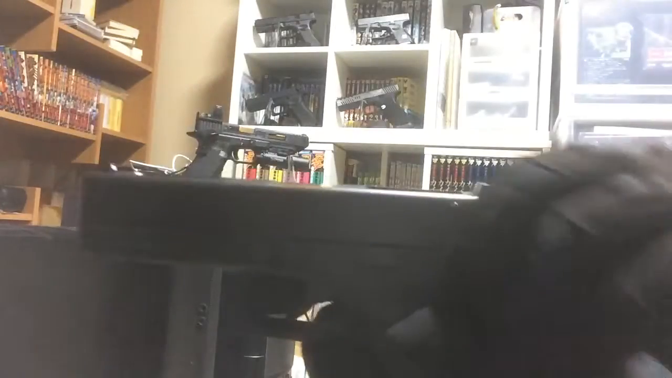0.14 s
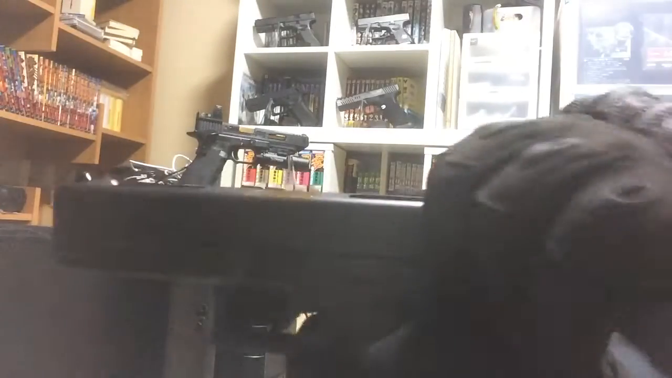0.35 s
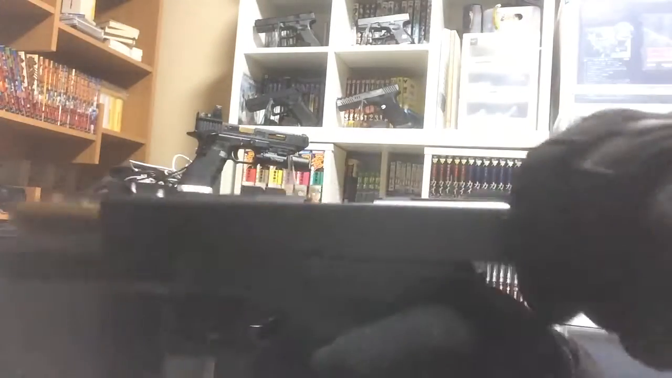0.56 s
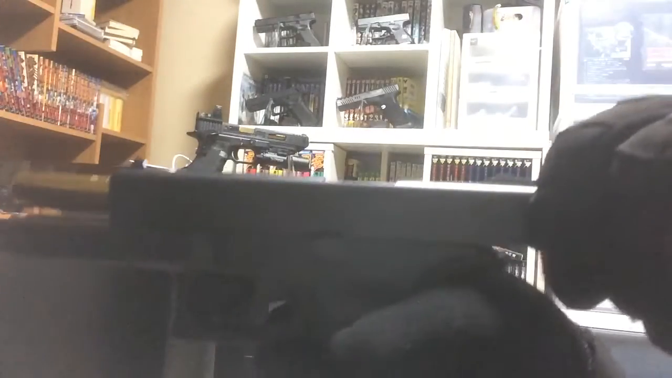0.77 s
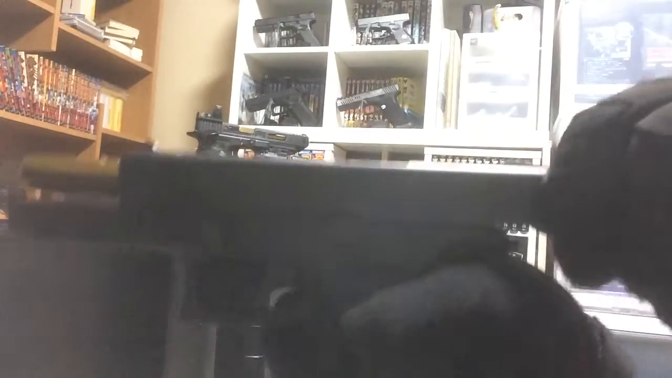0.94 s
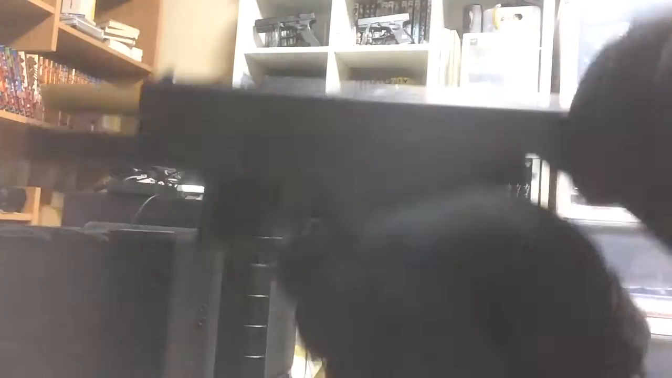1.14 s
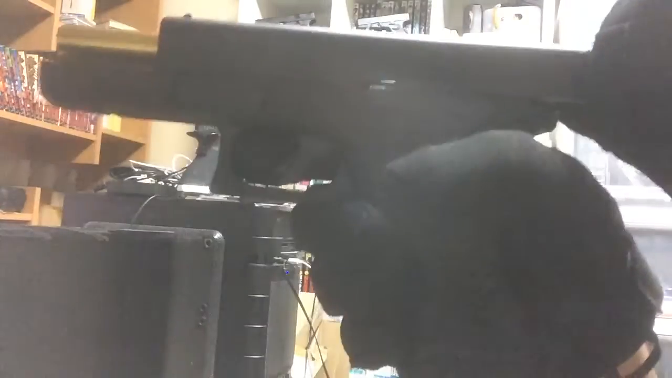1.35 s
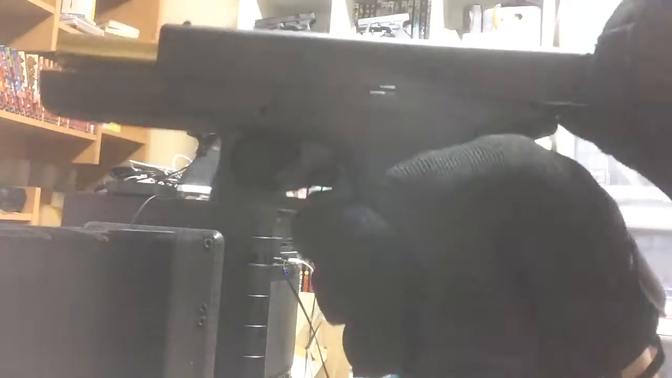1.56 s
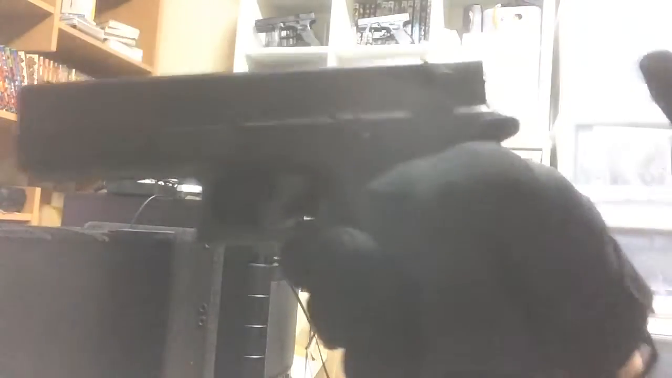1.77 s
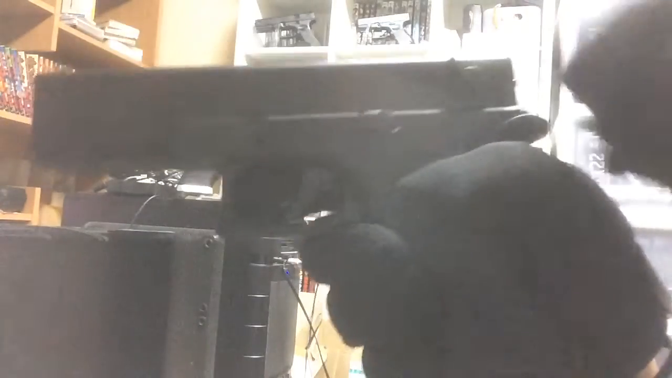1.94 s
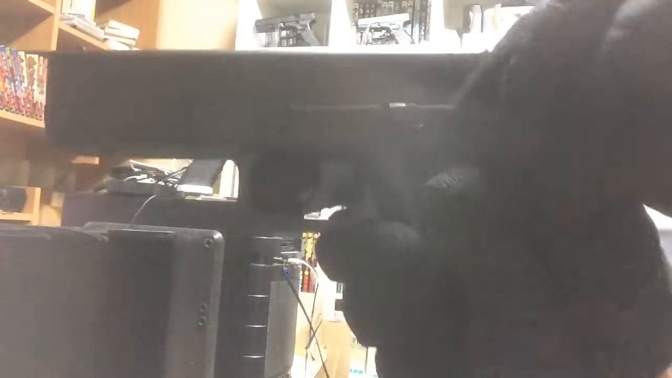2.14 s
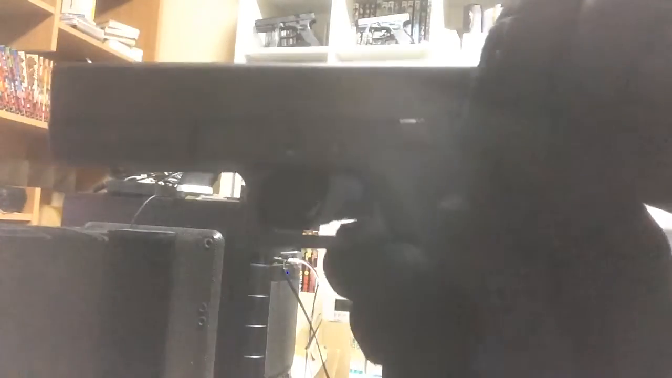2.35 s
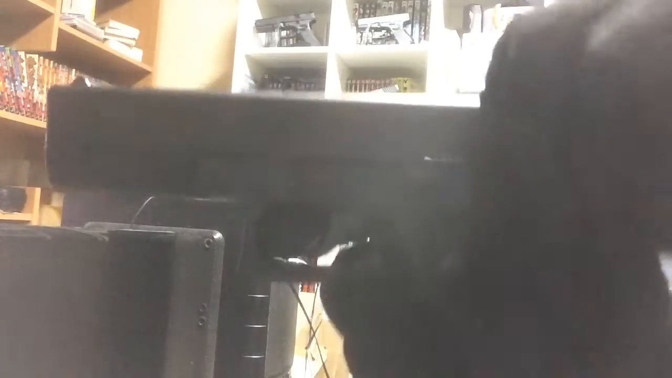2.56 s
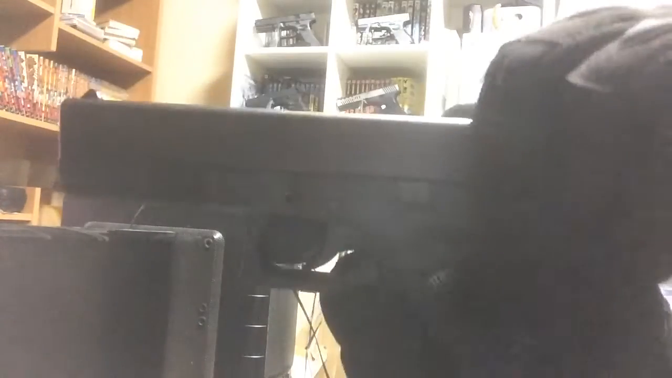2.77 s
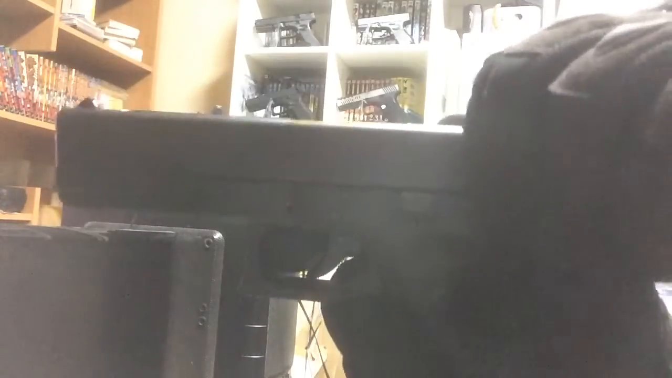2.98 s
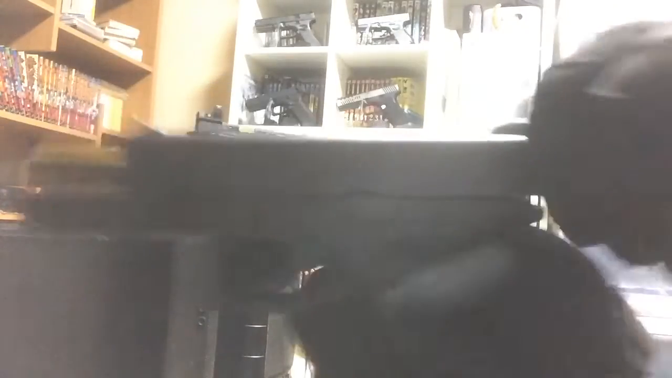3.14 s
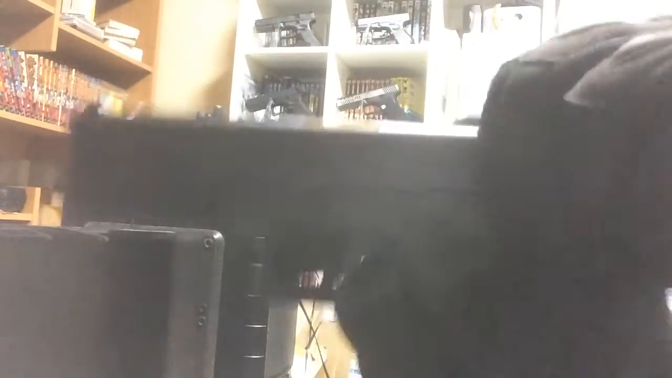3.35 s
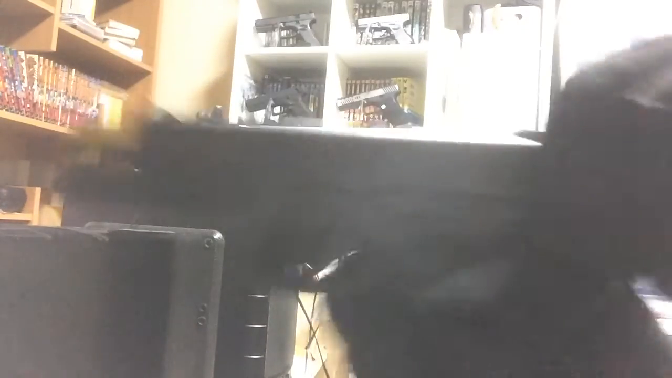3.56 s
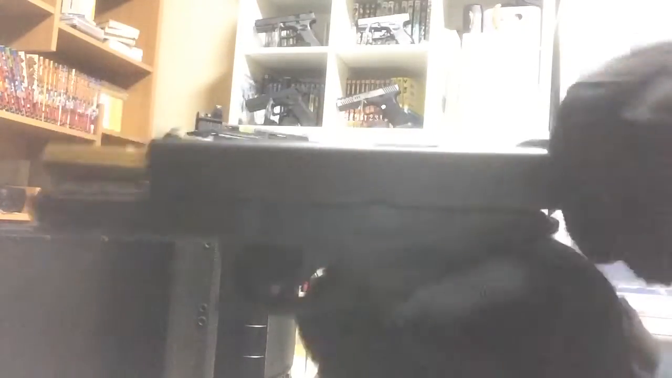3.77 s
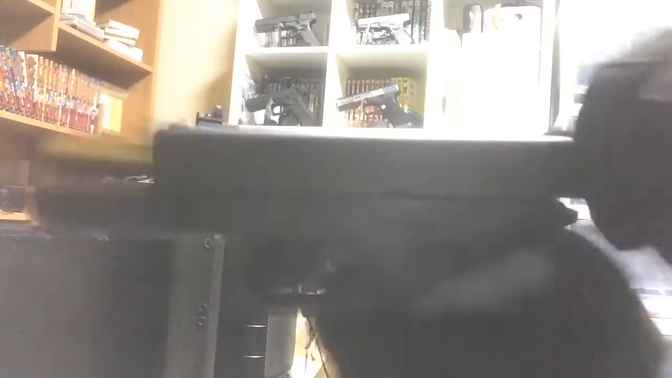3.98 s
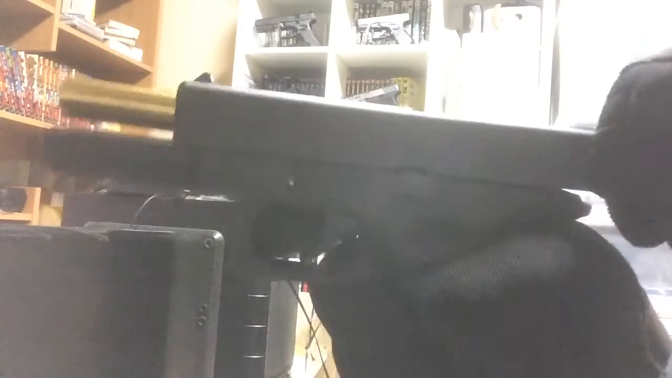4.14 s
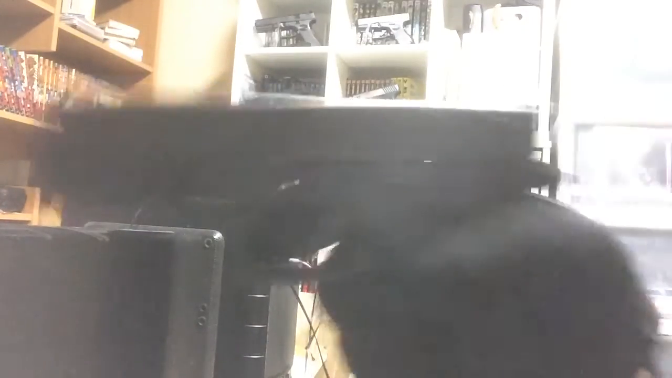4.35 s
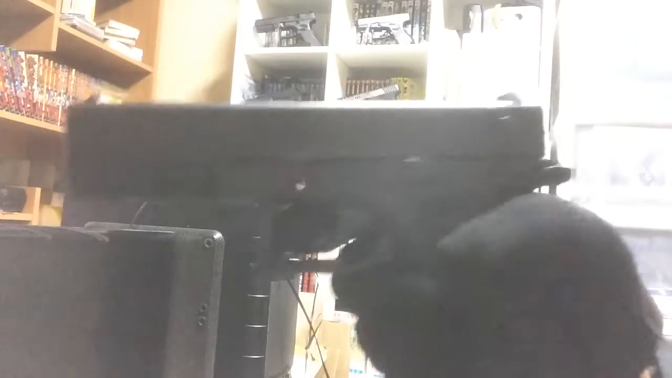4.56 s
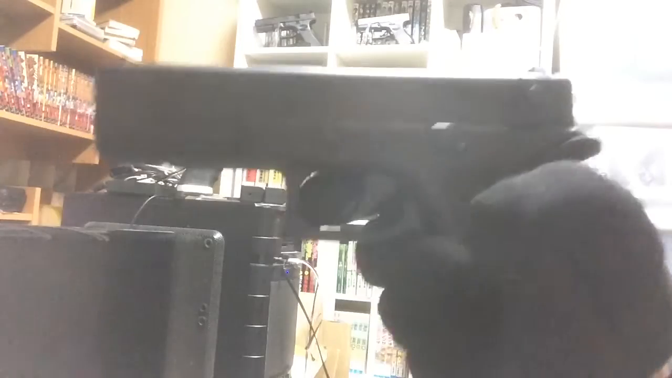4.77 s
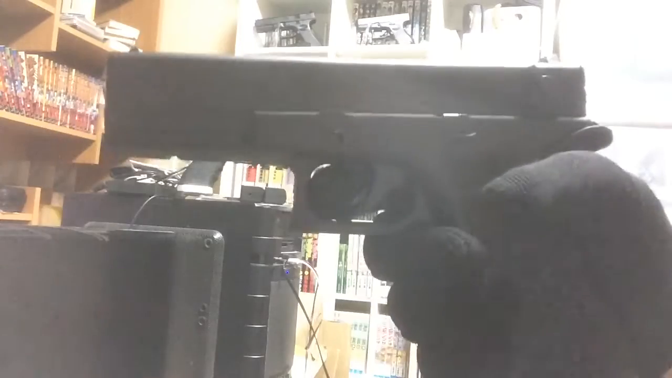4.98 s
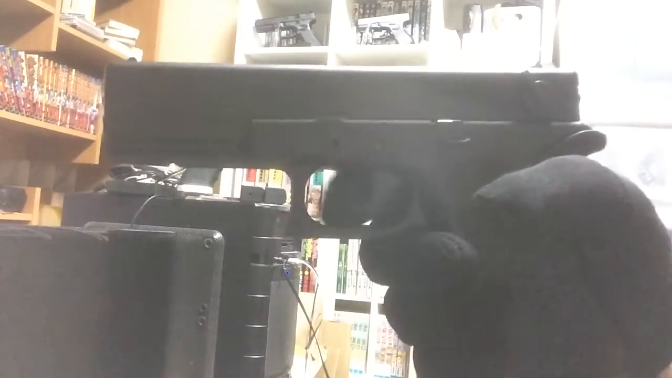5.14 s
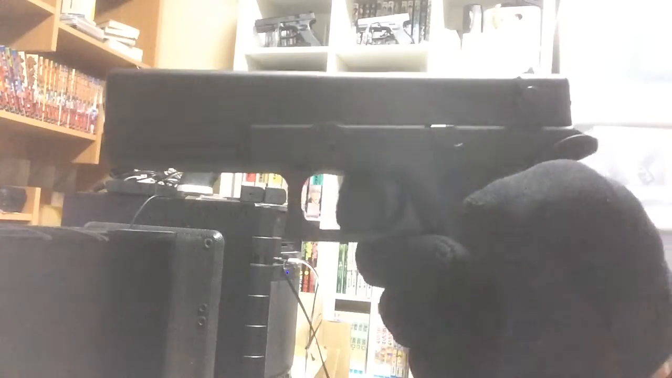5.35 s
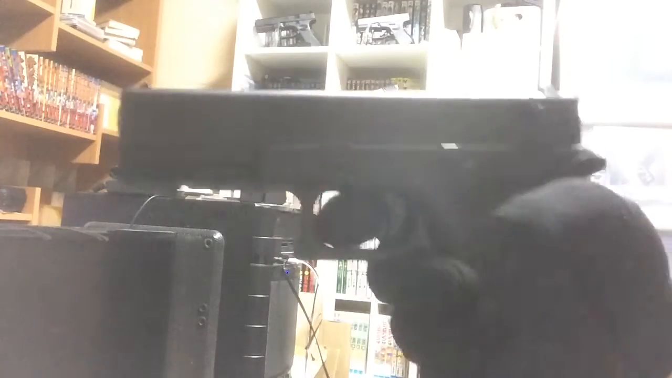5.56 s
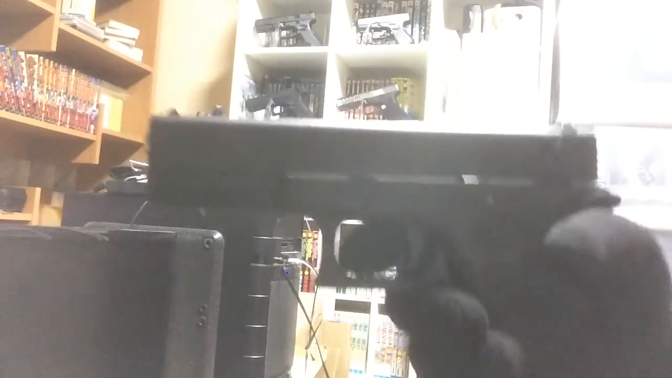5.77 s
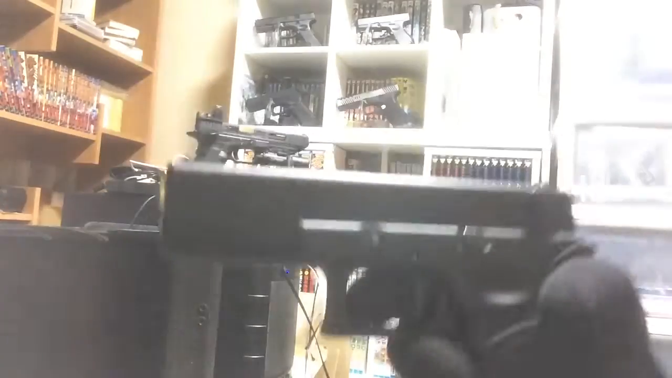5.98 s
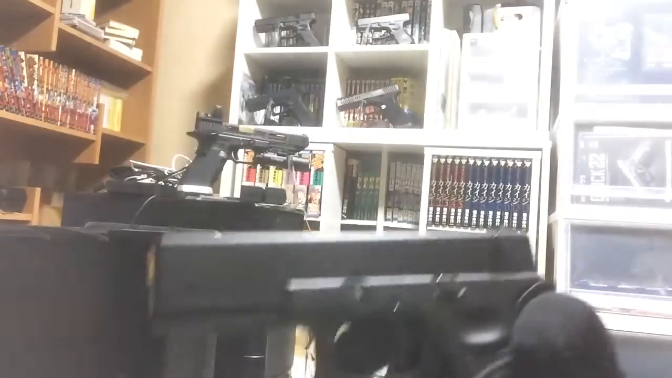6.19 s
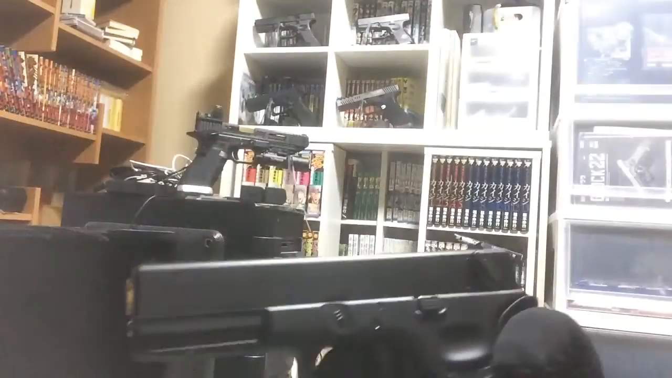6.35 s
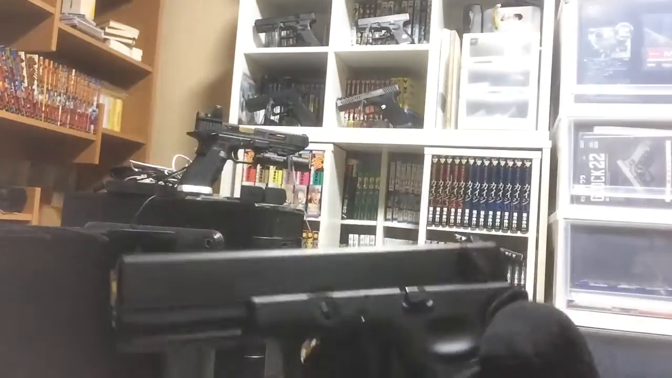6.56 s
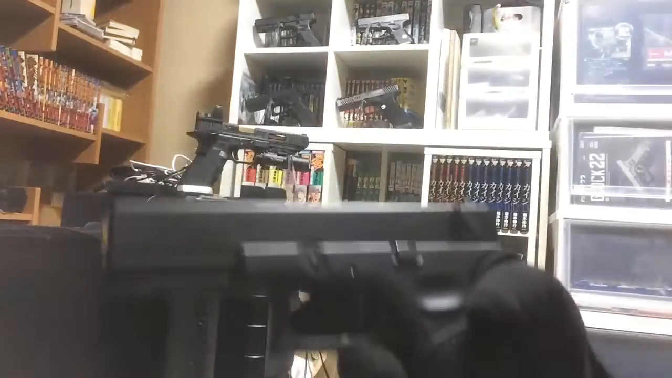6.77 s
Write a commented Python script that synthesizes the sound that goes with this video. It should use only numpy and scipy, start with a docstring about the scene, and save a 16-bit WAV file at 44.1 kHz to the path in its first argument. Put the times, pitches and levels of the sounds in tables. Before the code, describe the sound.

A toy pistol's slide is pulled and released with sharp metallic clacks, racked four times quickly, then dry-fired once in a small room.

```python
"""A small room, one microphone close to a gas toy pistol. A fan hums faintly; a glove shifts on the grip.
At 0.6 s the slide is pulled: the barrel unlocks and rings, the hammer cocks, the rear stop knocks.
Let go at 1.8 s, it bumps over the hammer and slams home. Four quick racks follow from 3.1 to 4.5 s,
and at 5.3 s the hammer falls in a dry shot. The blows hit the limiter, and the gain control
ducks the fan behind them."""
import sys
import numpy as np
from scipy import signal
from scipy.fft import rfft, irfft
from scipy.io import wavfile
from scipy.ndimage import uniform_filter1d, minimum_filter1d

SR = 44100
rng = np.random.default_rng(int(sys.argv[2]) if len(sys.argv) > 2 else 0)


def generate_wav(sig):
    """Save sig (samples, or channels by samples) to the path in sys.argv[1] as 16-bit PCM at SR."""
    pcm = np.round(np.clip(np.atleast_2d(sig).T, -1, 1) * 32767).astype(np.int16)
    wavfile.write(sys.argv[1], SR, pcm)


N = 300762
HIT = np.arange(4096) / SR  # time within one blow

# the fan's rush of air: f/Hz, level/dB
FAN_SPECTRUM = [(15, -40.5), (25, -17.5), (80, -10.5), (130, -15.5), (309, -8.5), (344, -4.5), (373, -9.5),
                (516, -11), (677, -13.5), (734, -14), (2110, -21.5), (2690, -28.5), (4250, -29),
                (11900, -38.5), (16000, -45)]
# the fan's hum: f/Hz, level/dB, waver/Hz
FAN_TONES = [(341, -67.5, 1.6), (682, -75, 7.1), (238, -75.5, 5.9), (97.5, -79, 2.4)]
# the glove shifts on the grip: t/s, length/s, level/dB
RUSTLES = [(.14, 0.22, -61.5), (2.13, .12, -63), (2.2, 0.38, -66.5), (2.84, 0.071, -66.5),
           (4.88, 0.088, -64), (5.72, .14, -72), (5.97, 0.16, -67.5)]
# glove friction: f/Hz, level/dB
GLOVE_SPECTRUM = [(200, -14), (1200, 11.5), (3500, 6), (7000, 3), (11000, -7.5), (16000, -22)]
# resonances of slide and frame: f/Hz, width/Hz, height/dB
FRAME_MODES = [(1288, 170, 4.5), (2020, 190, 7), (2226, 240, 2.5), (3330, 76, 2.5), (4490, 53, 8),
               (6050, 230, 2), (7400, 920, 6.5), (10580, 630, 4), (11880, 540, 4.5), (13800, 140, 5),
               (14550, 890, 5)]
# steel tapping steel: f/Hz, level/dB
STEEL_SPECTRUM = [(60, -45.5), (300, -27), (700, -15.5), (950, -7.5), (1200, .5), (1700, -1), (3000, -3),
                  (4300, -3.5), (6500, -8), (9000, -11.5), (12000, -11.5), (16000, -11)]
# trigger and grip tick: t/s, level/dB, mids over lows/dB, treble over lows/dB
TICKS = [(.5108, -42, -13.5, -28), (.731, -30, 4, 4), (0.762, -38, -2, -5), (1.2866, -59, -3, -15),
         (1.7207, -49, -9, -15.5), (3.132, -43, -3.5, -23.5), (4.229, -38.6, 2, -4.5),
         (4.8351, -52.5, -4.5, -21.1), (5.1855, -60, 6.5, 3), (5.2616, -48, -17, -24),
         (5.279, -34, -6, -21), (5.5092, -38.5, 1.5, -8.5), (6.1577, -63, 1, -10)]
# the recoil spring's thin tones: f/Hz, level/dB, t60/s
SPRING_MODES = [(10600, 0.5, 0.044), (11196, 1, .11), (11901, 2.5, .06), (13100, 5, .08),
                (14527, -1.5, .07)]
# the spring zings at the rear stop: t/s, level/dB, f/Hz, t60/s
ZINGS = [(0.659, -17, 14330, .11)]
# what the walls send back: f/Hz, level/dB
WALL_SPECTRUM = [(100, -9), (500, -6.5), (800, -8.5), (1300, -3.5), (2500, -1.5), (5000, 0.5), (8000, 1),
                 (12000, -1), (16000, 0)]
# the room's decay: f/Hz, t60/s
ROOM_T60 = [(200, 0.1), (800, 0.14), (2000, .17), (5500, .16), (10000, .15), (15000, .13)]
# echoes off desk and shelves: delay/s, level/dB
ECHOES = [(.0072, -9.5), (.0112, -11), (0.0161, -13.5)]
# the slide travels on its rails: t/s, length/s, rubbing/dB, rattle/dB
STROKES = [(.534, .024, -47.5, -45.5), (0.562, 0.1, -27, -25.5), (1.735, 0.033, -38.5, -40.5),
           (3.169, .1, -23, -21.5), (3.31, 0.095, -40.5, -30.5), (3.521, 0.11, -25, -29),
           (3.64, .06, -41, -34), (3.79, .085, -29.5, -25), (3.894, 0.065, -48.5, -39),
           (4.019, 0.073, -25, -25), (4.396, .02, -43.5, -50.5), (4.413, .035, -29, -32.5)]
# the loose slide clacks: t/s, level/dB, mids over lows/dB, treble over lows/dB
CLACKS = [(0.5493, -32.5, 3.5, -18), (0.6343, -14.5, -6.5, -7), (1.7448, -33, 11, 1), (1.7643, -9, 4, 3),
          (3.155, -36, -13.5, -26), (3.1615, -22.5, -1.5, 1.5), (3.24, -9.5, -2.5, -1),
          (3.3843, -21, -6, -6), (3.392, -19.5, -5.5, -29.5), (3.507, -19, 1, -1.5), (3.545, -18.5, 0, 6.5),
          (3.6771, -23, -3, -12), (3.723, -13, 10.5, 12), (3.782, -21.5, -6.5, -10), (3.852, -24, -8, -17),
          (3.957, -27.5, 4.5, -2.5), (4.4183, -14, 2.5, -5.5), (4.4368, -13.5, 1.5, 0)]
# the barrel tube's ring: f/Hz, level/dB, t60/s
BARREL_MODES = [(7264, -2, 0.06), (7050, -9.5, 0.036), (7530, -7.5, 0.036), (7700, -18, 0.043),
                (10440, -20.5, 0.073), (11770, -13.5, 0.037), (13100, -15.5, 0.033), (15500, -22.5, .035)]
# the barrel unlocks: t/s, level/dB, ring/dB, lead of the lug's touch/s, that touch/dB, seating/dB
UNLOCKS = [(0.5712, -9.5, -2, 0.011, -15.5, -6), (3.1788, -12, 3, 0.008, -13.5, -11),
           (3.5257, -11.5, -16, 0.0063, -18.5, -14.5), (3.804, -12.5, -6.5, 0.0075, -21, -16.5),
           (4.0438, -14, -4.5, .0047, -17, -13.5)]
# the hammer snaps onto its sear: t/s, level/dB
COCKS = [(0.6044, -7.5), (3.218, -7.5), (3.552, -8), (3.8257, -9), (4.06, -10)]
# the hammer being cocked: f/Hz, level/dB
COCK_SPECTRUM = [(60, -43.5), (400, -22), (900, -13.5), (1300, 2), (1800, -1), (3000, 2.5), (4200, -2.5),
                 (5200, -13.5), (7000, -15), (10000, -19.5), (13000, -23), (16000, -19)]
# the slide hits its rear stop: t/s, level/dB, mids over lows/dB, treble over lows/dB, bounce delay/s
REAR_STOPS = [(.6595, -1, -9, -9, 0.011), (3.269, -4, -1.5, -9.5, 0.0076), (3.59, -19.5, -10, -10, .013),
              (3.877, -9.5, 1.5, -9.5, 0.0064), (4.092, -1, -8, -9, 0.013)]
# low jolts of the heaviest blows: t/s, level/dB, lower edge/Hz, upper edge/Hz
THUDS = [(0.6596, -9, 20, 620), (1.7772, -4.5, 350, 785), (3.4154, -12, 14, 446), (3.708, -6, 240, 838),
         (3.9795, -8.5, 120, 300), (4.0921, -29.5, 30, 377), (4.4509, 1, 220, 1053), (5.3062, -8, 20, 444)]
# the slide runs forward over the hammer: t/s, level/dB
BUMPS = [(1.755, -10), (3.364, -21.5), (3.6608, -18), (3.94, -15.5), (4.429, -7.5)]
# the slide slams home: t/s, level/dB, mids over lows/dB, treble over lows/dB, ring/dB, chatter/s,
# room send/dB, barrel pickup/dB
SLAMS = [(1.7741, -6, 2, 1, -19, 0.0055, -1.5, -17), (3.4158, -2.5, -2.8, -2.3, -11, 0.0055, -11, -14),
         (3.7054, -7, -4.5, -3.5, -13.5, 0.0087, -10, -23),
         (3.9764, -2.5, -3.5, -4.5, -14, 0.0067, -12, -22.5),
         (4.4458, -3.5, 1, 0.5, -16, 0.0068, -4, -18.5)]
# slide and frame pressed shut: f/Hz, level/dB
LOCKED_SPECTRUM = [(60, -25.5), (300, -8.5), (700, -5.5), (1000, -4), (1400, -0.5), (2200, -1), (3200, 2),
                   (4500, -0.5), (6500, -2.5), (9000, -11), (12000, -4), (16000, -12)]
# the sear lets go, then the hammer falls: t/s, level/dB, room send/dB
DRY_FIRE = [(5.3041, -22, -20.5), (5.306, -2.5, -10.5)]
# the snap of the dry shot: f/Hz, level/dB
SNAP_SPECTRUM = [(100, -18), (500, -12.5), (730, -13), (1050, 2.5), (2000, 2.5), (2900, 0), (4100, 0.5),
                 (5400, -6), (8500, -11), (10000, -18.5), (13000, -12), (16000, -22)]


def amp(db):
    """Decibels to gain."""
    return 10 ** (np.asarray(db) / 20)


def unit_rms(x):
    """Scales to rms 1."""
    return x / np.sqrt(np.mean(x ** 2) + 1e-20)


def packet(x):
    """Scales a blow to the energy of ten milliseconds at rms 1."""
    return x / np.sqrt(np.sum(x ** 2) / (SR / 100) + 1e-20)


def curve(points, hz):
    """Interpolates a table on a log-frequency axis."""
    f, value = np.transpose(points)
    return np.interp(np.log(hz + 1), np.log(f + 1), value)


def add(mix, s, sound):
    """Mixes a sound in at time s."""
    part = mix[round(s * SR):][:len(sound)]
    part += sound[:len(part)]


def noise(colour):
    """Steady noise at rms 1, its spectrum shaped by colour(hz)."""
    return unit_rms(irfft(rfft(rng.standard_normal(N)) * colour(np.fft.rfftfreq(N, 1 / SR)), N))


def causal(colour, size=4096):
    """The sharp-fronted impulse response whose gain at each frequency is colour(hz)."""
    cepstrum = irfft(np.log(np.maximum(colour(np.fft.rfftfreq(size, 1 / SR)), 1e-4)))
    folded = np.r_[cepstrum[0], 2 * cepstrum[1:size // 2]]
    return irfft(np.exp(rfft(folded, size)))[:size // 2]


def fan():
    """Far in the background, a soft rush of air with a few slightly wavering tones."""
    hum = np.zeros(N)
    for pitch_hz, db, waver_hz in FAN_TONES:
        drift = noise(lambda hz: 1 / (1 + (hz / 8) ** 2))
        hum += amp(db) * unit_rms(np.sin(2 * np.pi * np.cumsum(pitch_hz + waver_hz * drift) / SR))
    return hum + amp(-61.1) * noise(lambda hz: amp(curve(FAN_SPECTRUM, hz)))


def rubbing(strokes, response, grain_db):
    """Friction: grains of uneven size swell and fade under each stroke."""
    pressure = np.zeros(N)
    for s, length, db, *_ in strokes:
        add(pressure, s, amp(db) * signal.windows.tukey(int(length * SR), .7))
    grains = amp(grain_db * unit_rms(uniform_filter1d(rng.standard_normal(N), size=90)))
    return pressure * unit_rms(signal.oaconvolve(grains * rng.standard_normal(N), response)[:N])


def glove():
    """The glove rubs softly on the grip, close to the microphone."""
    return rubbing(RUSTLES, causal(lambda hz: amp(curve(GLOVE_SPECTRUM, hz))), grain_db=1.5)


def frame(spectrum, resonance_db, detune=0.012):
    """The pistol's answer to one tap; its resonances shift and trade strength from tap to tap."""
    shifts, shares_db = rng.standard_normal((2, len(FRAME_MODES)))

    def colour(hz):
        peaks = 0
        for (f, width, db), shift, share_db in zip(FRAME_MODES, shifts, shares_db):
            off_centre = 2 * (hz - f * (1 + detune * shift)) / width
            peaks += amp(db + resonance_db + share_db) / (1 + off_centre ** 2)
        return amp(curve(spectrum, hz)) * np.hypot(1, peaks)
    return causal(colour)


def touch(chatter_s, rattle_db):
    """The force of one sharp tap, after which the parts chatter and settle."""
    chatter = packet(rng.standard_normal(len(HIT)) * np.exp(-HIT / chatter_s))
    return packet(signal.unit_impulse(len(HIT))) + amp(rattle_db) * chatter


def strike(force, response, mid_db, treble_db):
    """A contact force drives the frame; its hardness sets the balance of lows, mids and treble."""
    body = signal.fftconvolve(force, response)[:len(HIT)]
    hz, power = np.fft.rfftfreq(len(HIT), 1 / SR), abs(rfft(body)) ** 2
    bands_hz = [(900, 2600), (2600, 6600), (8200, 16000)]
    bands_db = [10 * np.log10(power[(hz > a) & (hz < b)].mean() * (b - a)) for a, b in bands_hz]
    low, mid, treble = np.array([0, mid_db, treble_db]) - bands_db
    hardness = [(2200, 0), (3000, mid - low), (6000, mid - low), (9000, treble - low)]
    tilt = causal(lambda hz: amp(curve(hardness, hz)))
    return packet(signal.fftconvolve(body, tilt)[:len(HIT)])


def contact(db, mid_db, treble_db, chatter_s, resonance_db=1):
    """One steel-on-steel contact, heard through the frame."""
    force = touch(chatter_s, rattle_db=11.5)
    return amp(db) * strike(force, frame(STEEL_SPECTRUM, resonance_db), mid_db, treble_db)


def ticks():
    """Trigger and grip tick dryly, barely ringing the frame."""
    out = np.zeros(N)
    for s, db, mid_db, treble_db in TICKS:
        add(out, s, contact(db, mid_db, treble_db, chatter_s=0.0028, resonance_db=-13.5))
    return out


def spring(knocks):
    """The recoil spring rings high and thin with the knocks, and zings once, fully compressed."""
    response = np.zeros(len(HIT))
    for hz, db, t60 in SPRING_MODES:
        unity_peak = 2 * np.log(1000) / (t60 * SR)  # makes db the gain at resonance
        response += unity_peak * amp(db - 60 * HIT / t60) * np.cos(2 * np.pi * hz * HIT)
    out = signal.oaconvolve(knocks, response)[:N]
    for s, db, hz, t60 in ZINGS:
        add(out, s, amp(db) * packet(amp(-60 * HIT / t60) * np.sin(2 * np.pi * hz * HIT)))
    return out


def room(x, echo_db, build_s=0.0075):
    """Desk and shelves near the microphone give a few echoes, then comes a dense, short tail."""
    t = np.arange(SR // 2) / SR
    hz, when, bins = signal.stft(rng.standard_normal(len(t)), SR, nperseg=256)
    bins *= amp(curve(WALL_SPECTRUM, hz)[:, None] - 60 * when / curve(ROOM_T60, hz)[:, None])
    tail = signal.istft(bins, SR, nperseg=256)[1][:len(t)]
    tail *= 1 - np.exp(-(t / build_s) ** 4)
    tail /= np.linalg.norm(tail)
    for s, db in ECHOES:
        add(tail, s, amp([db + echo_db]))
    return signal.fftconvolve(x, tail)[:N]


def rails(count=7, size_db=3, colour_db=2):
    """The moving slide rubs on its rails and rattles: contacts of chance time, size and hardness."""
    out = rubbing(STROKES, frame(STEEL_SPECTRUM, resonance_db=0.5), grain_db=3.5)
    for s, length, _, rattle_db in STROKES:
        times = s + length * (np.arange(count) + rng.random(count)) / count
        for at, (size, mid, treble) in zip(times, rng.standard_normal((count, 3))):
            mid_db, treble_db = colour_db * mid - 1.7, colour_db * treble - 8
            add(out, at, contact(rattle_db + size_db * size, mid_db, treble_db, chatter_s=0.0022))
    return out


def clacks():
    """The loose slide clacks against its rails."""
    out = np.zeros(N)
    for s, db, mid_db, treble_db in CLACKS:
        add(out, s, contact(db, mid_db, treble_db, chatter_s=0.0023))
    return out


def barrel():
    """The short, high ring of the struck barrel tube."""
    ring = np.zeros(len(HIT))
    for hz, db, t60 in BARREL_MODES:
        decay = amp(db + 2 * rng.standard_normal() - 60 * HIT / t60)
        ring += decay * np.sin(2 * np.pi * (hz * HIT + rng.random()))
    return packet(ring)


def pulls(seat_s=0.007, bounce_db=-10):
    """The lug touches, the barrel unlocks and seats, the hammer cocks, the slide bounces on its stop."""
    knocks, ring = np.zeros((2, N))
    for s, db, ring_db, lead_s, lug_db, seat_db in UNLOCKS:
        add(knocks, s - lead_s, contact(lug_db, mid_db=-2.5, treble_db=-6, chatter_s=0.0045))
        add(ring, s - lead_s, amp(lug_db + 0.5) * barrel())
        add(knocks, s, contact(db, mid_db=2.5, treble_db=0, chatter_s=0.004))
        add(ring, s, amp(ring_db) * barrel())
        add(knocks, s + seat_s, contact(seat_db, mid_db=3.5, treble_db=-8, chatter_s=0.0038))
    for s, db in COCKS:
        force = touch(chatter_s=0.0046, rattle_db=-2)
        click = signal.fftconvolve(force, frame(COCK_SPECTRUM, resonance_db=-3.5))
        add(knocks, s, amp(db + 2.4) * packet(click))
    for s, db, mid_db, treble_db, bounce_s in REAR_STOPS:
        add(knocks, s, contact(db, mid_db, treble_db, chatter_s=0.0029))
        add(knocks, s + bounce_s, contact(db + bounce_db, mid_db=0.3, treble_db=-3, chatter_s=0.004))
    return knocks, ring


def thuds(deep_push_db=-15.5):
    """Heavy blows jolt the air at the microphone: one strongly damped low swing each."""
    out = np.zeros(N)
    for s, db, low_hz, high_hz in THUDS:
        def band(hz):
            highpass = hz ** 2 / np.hypot(hz ** 2, low_hz ** 2)
            return np.hypot(amp(deep_push_db), highpass) / np.hypot(1, (hz / high_hz) ** 3)
        add(out, s, amp(db) * packet(causal(band)))
    return out


def releases(lead_s=0.0051):
    """Running forward, the slide bumps dully over the hammer and picks up the barrel just before home."""
    knocks, ring = np.zeros((2, N))
    for s, db in BUMPS:
        add(knocks, s, contact(db, mid_db=-12.5, treble_db=-22.5, chatter_s=0.0041))
    for s, *_, pickup_db in SLAMS:
        add(knocks, s - lead_s, contact(pickup_db, mid_db=-2.5, treble_db=-4, chatter_s=0.0016))
        add(ring, s - lead_s, amp(pickup_db - 4.5) * barrel())
    return knocks, ring


def slams():
    """The slide slams home and grinds into lock; returns the close sound and the room send."""
    close, send = np.zeros((2, N))
    tap = packet(signal.unit_impulse(len(HIT)))
    for s, db, mid_db, treble_db, ring_db, chatter_s, room_db, _ in SLAMS:
        grind = rng.standard_normal(len(HIT)) * np.exp(-(HIT / (1.7 * chatter_s)) ** 4)
        damped = frame(LOCKED_SPECTRUM, resonance_db=-9)  # pressed shut, slide and frame hardly ring
        add(close, s, amp(db + 1.93) * strike(grind, damped, mid_db, treble_db))
        add(close, s, amp(ring_db + 3) * barrel())
        radiated = strike(tap + 1.5 * packet(grind), damped, mid_db, treble_db)
        add(send, s + chatter_s / 2, amp(db + room_db + 1.5) * radiated)
    return close, send


def dry_fire():
    """The sear lets go and the hammer snaps down; returns the close sound and the room send."""
    close, send = np.zeros((2, N))
    for s, db, room_db in DRY_FIRE:
        snap = frame(SNAP_SPECTRUM, resonance_db=-17)
        force = touch(chatter_s=0.0018, rattle_db=0.5)
        add(close, s, amp(db) * packet(signal.fftconvolve(force, snap)))
        add(send, s, amp(db + room_db) * packet(snap))
    return close, send


def scene():
    """At the microphone: pistol and glove close up, the room and the fan behind them."""
    knocks, ring = np.add(pulls(), releases())
    knocks = knocks + clacks() + ticks() + rails()
    action = knocks + spring(knocks)
    blows, send = np.add(slams(), dry_fire())
    close = action + ring + blows + thuds() + glove()
    reverb = amp(-13.5) * room(action + amp(-7) * ring, echo_db=2.5) + room(send, echo_db=-15)
    return (close + reverb + fan())[None]


def record(dry, threshold_db=-27, depth_db=10, hold_s=0.18, release_s=0.15, ceiling=0.92,
           low_cut_hz=20, high_cut_hz=15900):
    """Behind the microphone, the gain drops at once, holds and recovers; a fast limiter catches peaks."""
    power_db = 10 * np.log10(abs(uniform_filter1d(dry[0] ** 2, size=300)) + 1e-12)
    over_db = np.clip(power_db - threshold_db, 0, depth_db)
    hold = int(hold_s * SR)
    held_db = -minimum_filter1d(-over_db, hold, origin=(hold - 1) // 2, mode="constant")
    recovery_db = np.arange(N) / SR * depth_db / release_s
    duck_db = np.maximum.accumulate(held_db + recovery_db) - recovery_db
    ducked = dry[0] * amp(-uniform_filter1d(duck_db, size=100))
    hiss = amp(-74) * noise(lambda hz: 1 / np.hypot(1, hz / 3500))  # the recorder's own noise
    slope = (np.fft.rfftfreq(N, 1 / SR) / low_cut_hz) ** 4
    highpassed = irfft(rfft(ducked + hiss) * slope / (1 + slope), N)
    limiter_gain = minimum_filter1d(ceiling / np.maximum(abs(highpassed), ceiling), size=21)
    limited = highpassed * uniform_filter1d(limiter_gain, size=21)
    lowpass = signal.firwin(401, high_cut_hz, window=("kaiser", 8), fs=SR)
    return signal.oaconvolve(limited, lowpass, "same")[None]


dry = scene()
out = record(dry)
generate_wav(out)
```